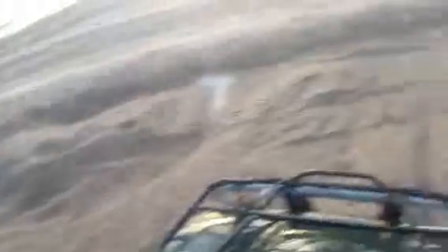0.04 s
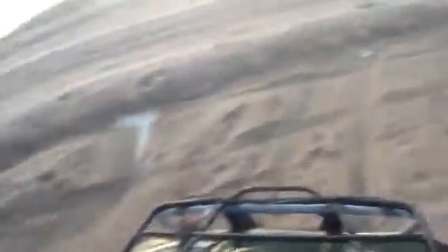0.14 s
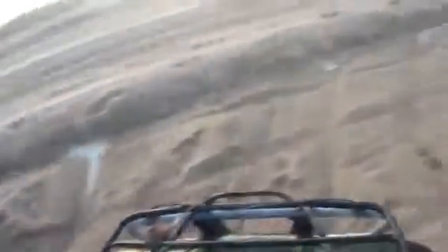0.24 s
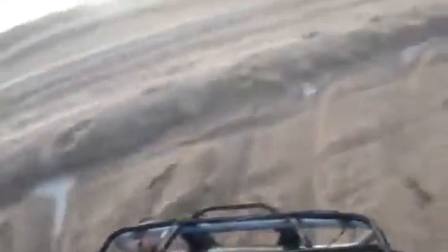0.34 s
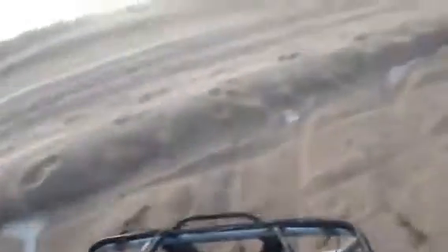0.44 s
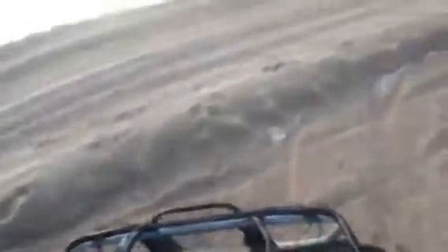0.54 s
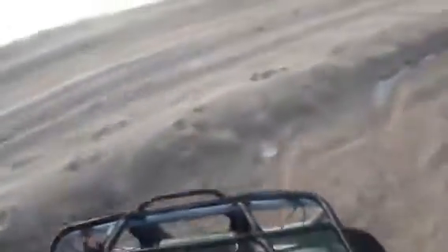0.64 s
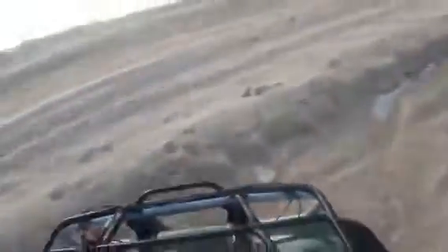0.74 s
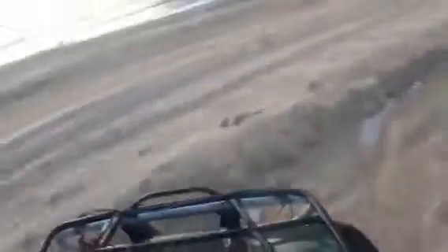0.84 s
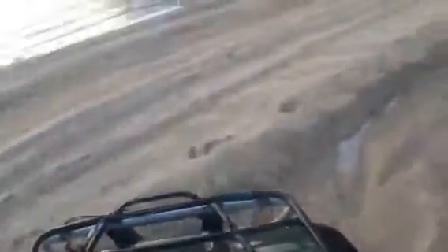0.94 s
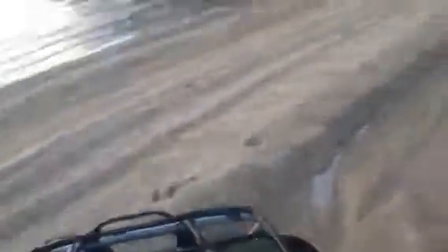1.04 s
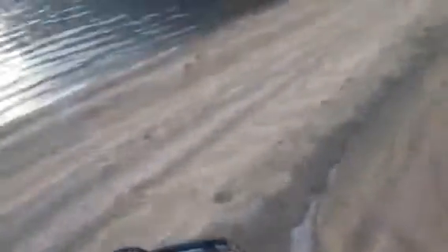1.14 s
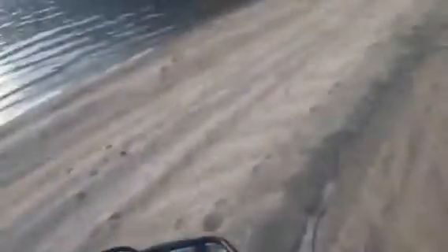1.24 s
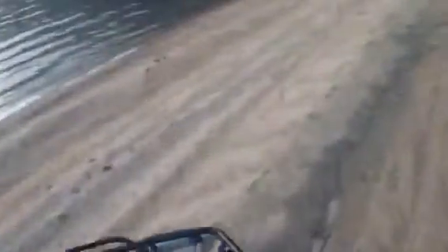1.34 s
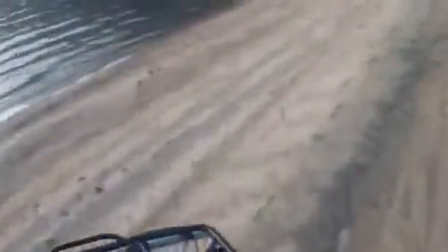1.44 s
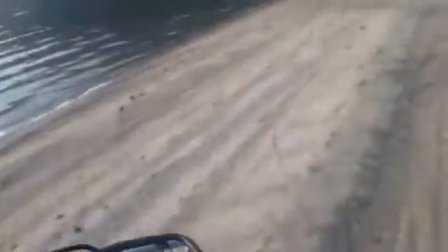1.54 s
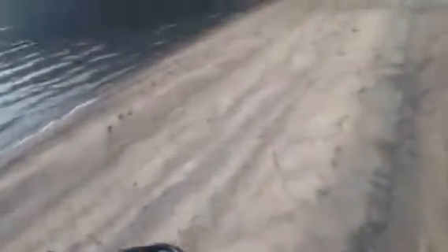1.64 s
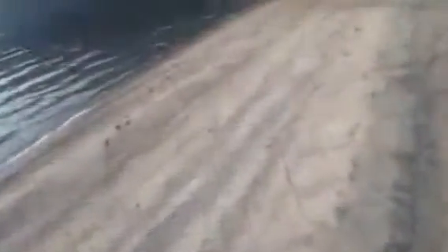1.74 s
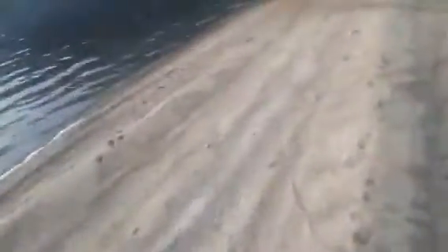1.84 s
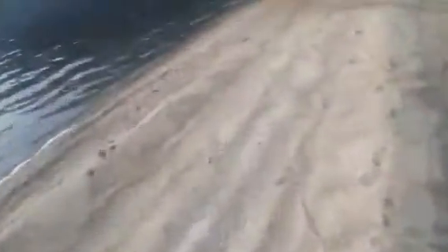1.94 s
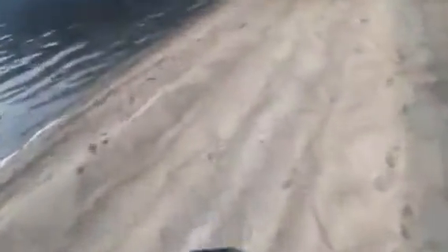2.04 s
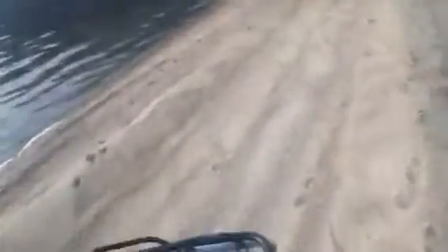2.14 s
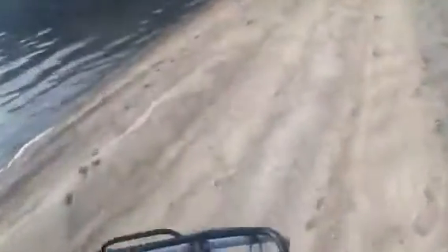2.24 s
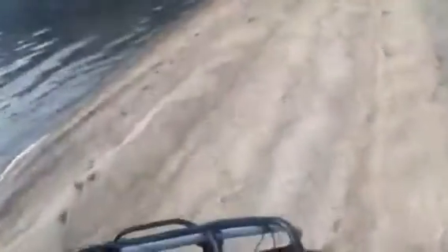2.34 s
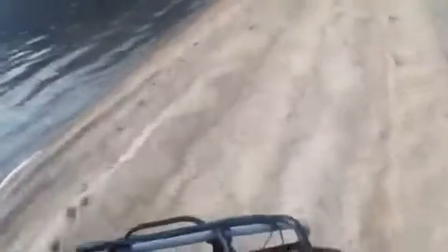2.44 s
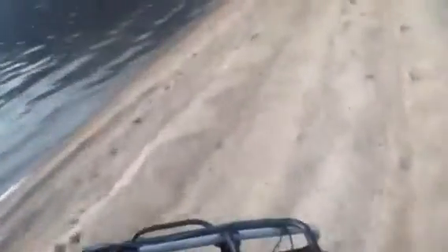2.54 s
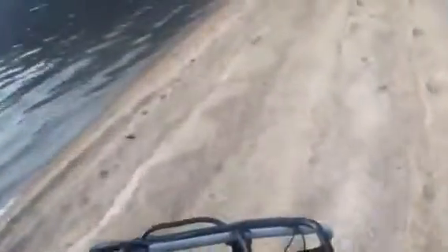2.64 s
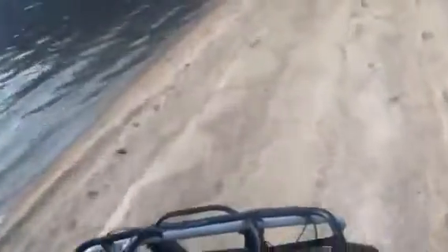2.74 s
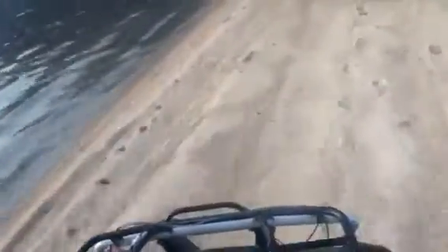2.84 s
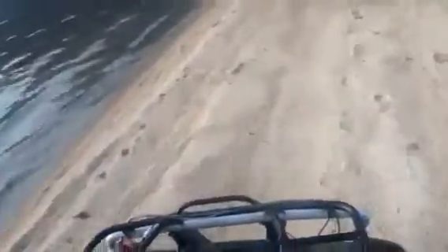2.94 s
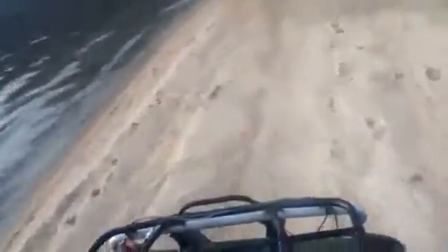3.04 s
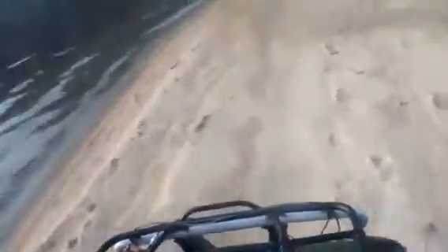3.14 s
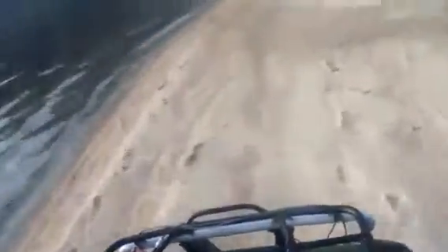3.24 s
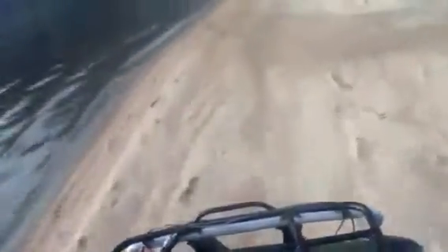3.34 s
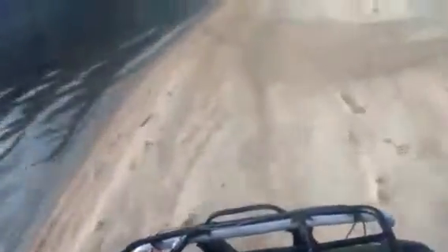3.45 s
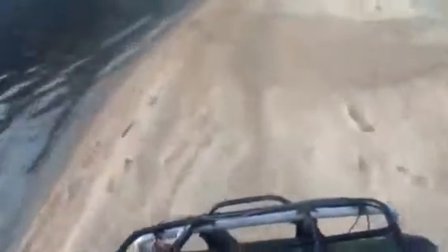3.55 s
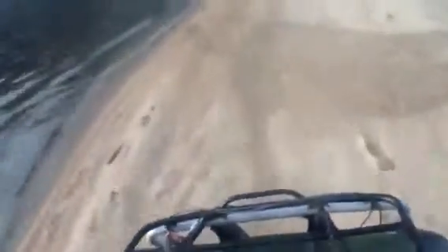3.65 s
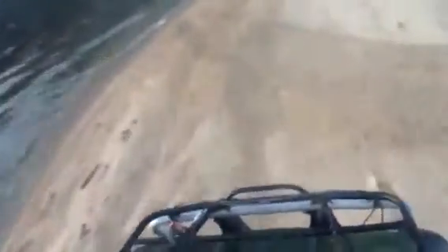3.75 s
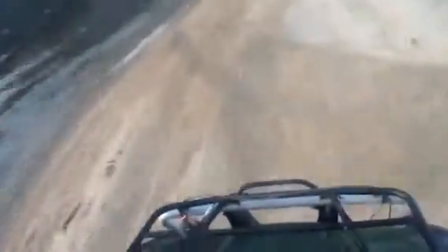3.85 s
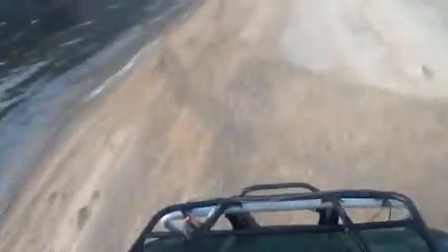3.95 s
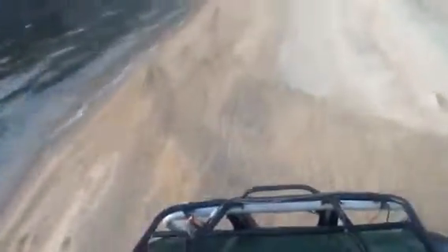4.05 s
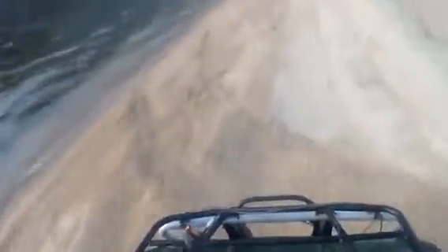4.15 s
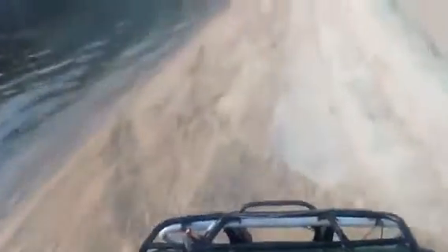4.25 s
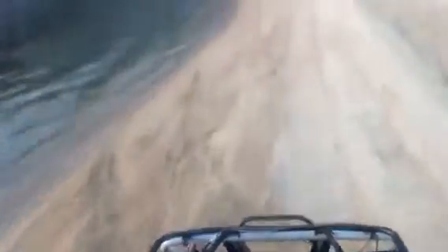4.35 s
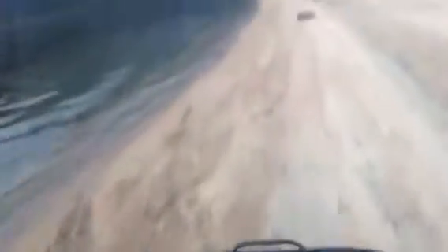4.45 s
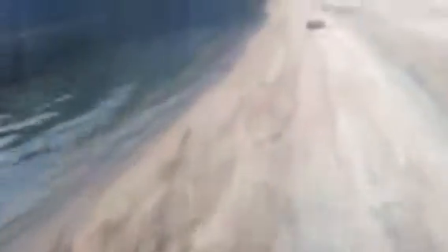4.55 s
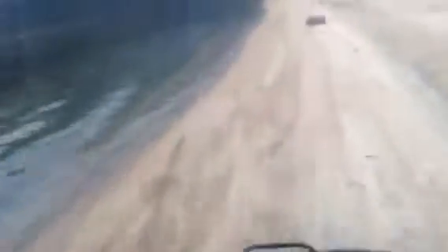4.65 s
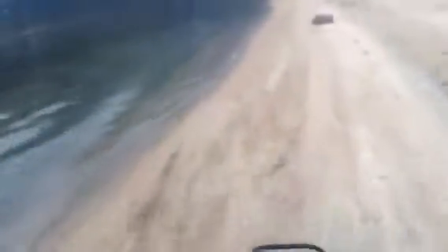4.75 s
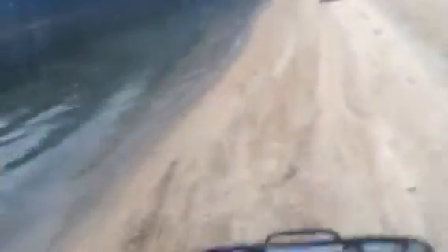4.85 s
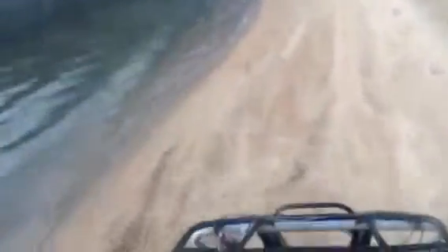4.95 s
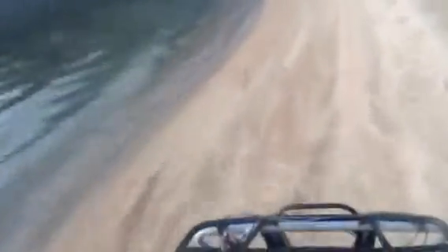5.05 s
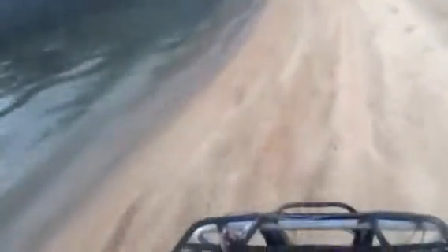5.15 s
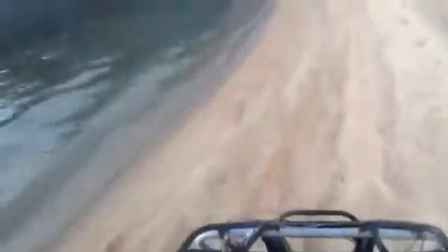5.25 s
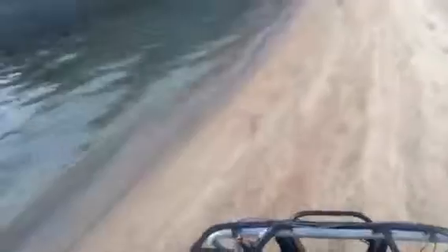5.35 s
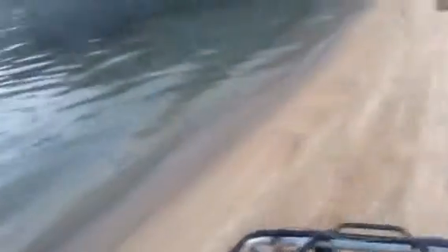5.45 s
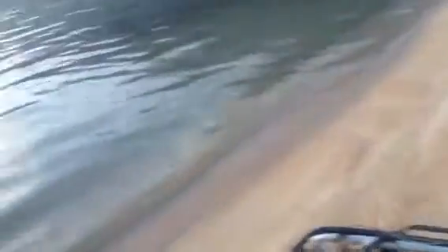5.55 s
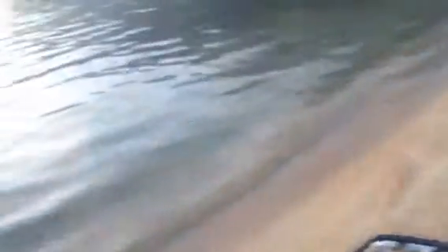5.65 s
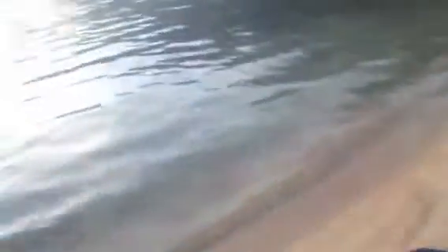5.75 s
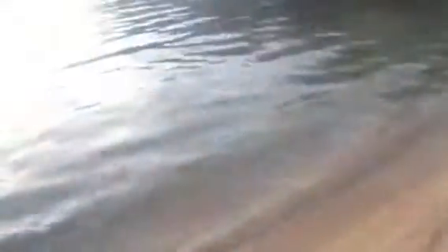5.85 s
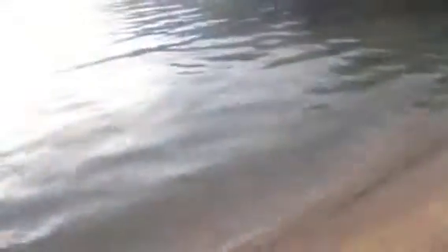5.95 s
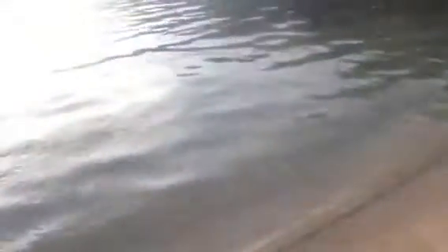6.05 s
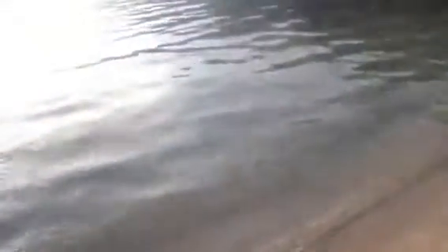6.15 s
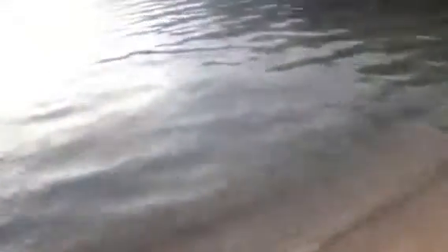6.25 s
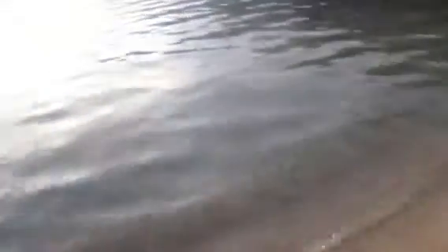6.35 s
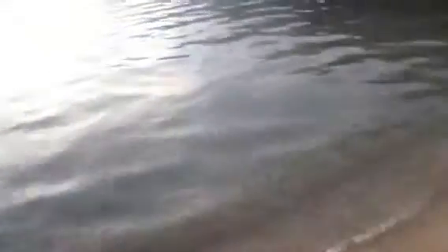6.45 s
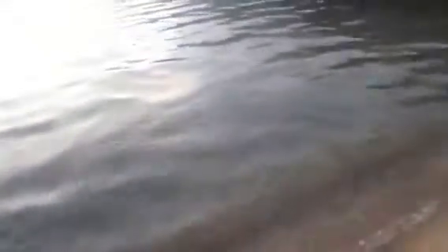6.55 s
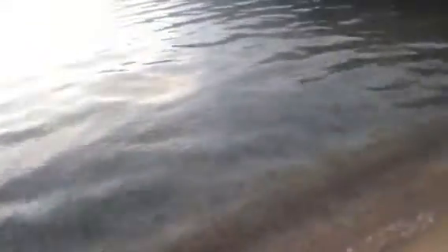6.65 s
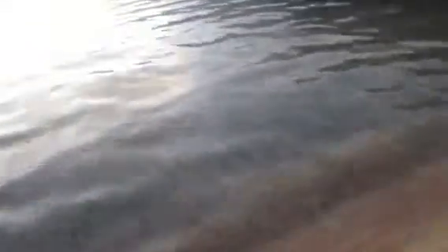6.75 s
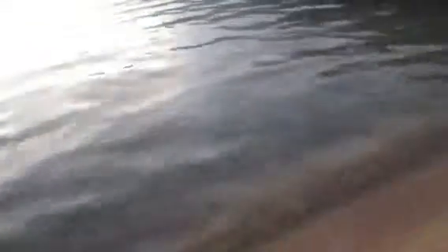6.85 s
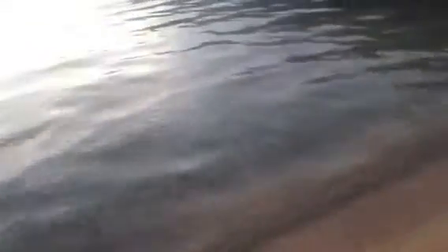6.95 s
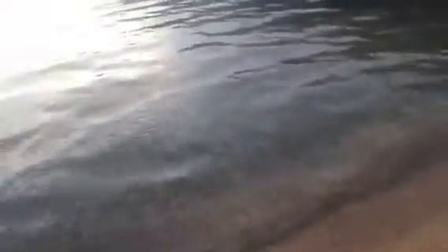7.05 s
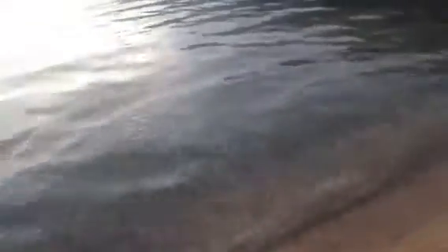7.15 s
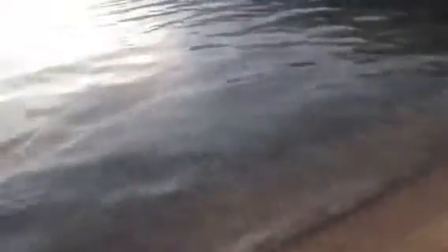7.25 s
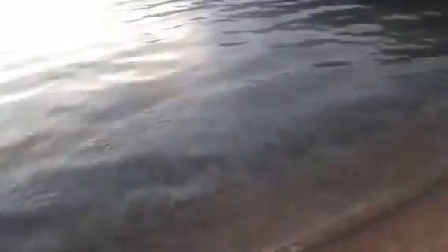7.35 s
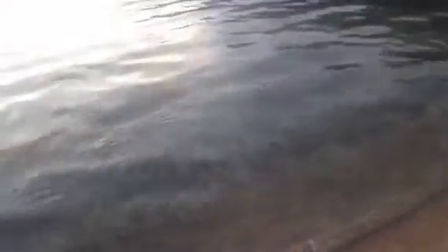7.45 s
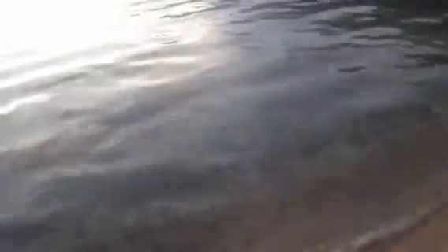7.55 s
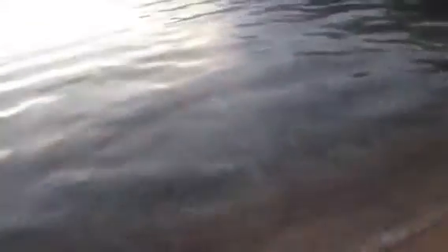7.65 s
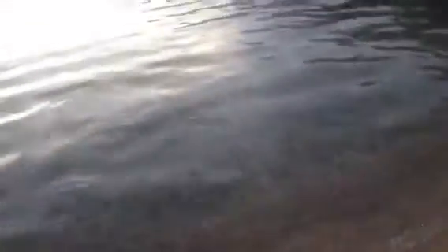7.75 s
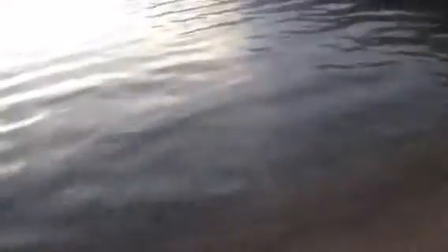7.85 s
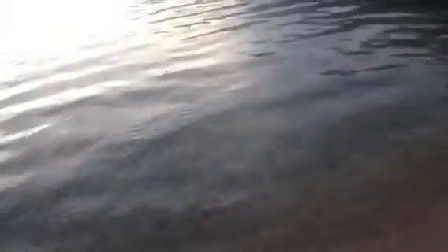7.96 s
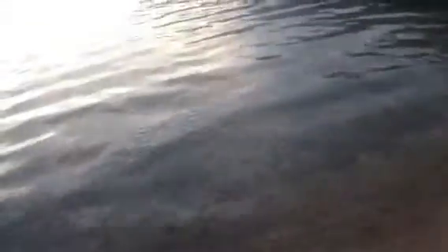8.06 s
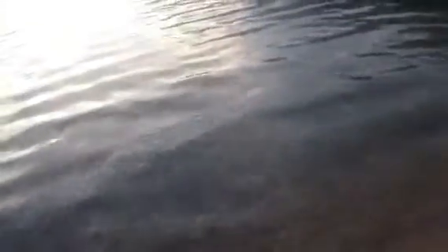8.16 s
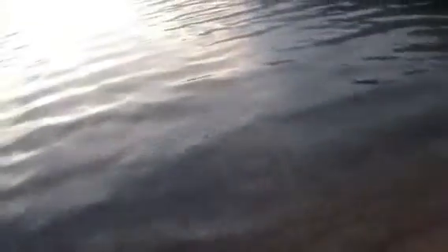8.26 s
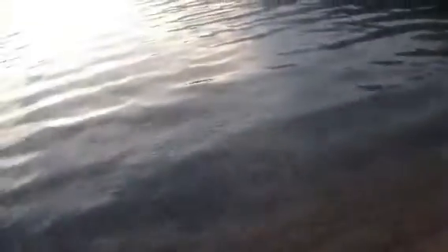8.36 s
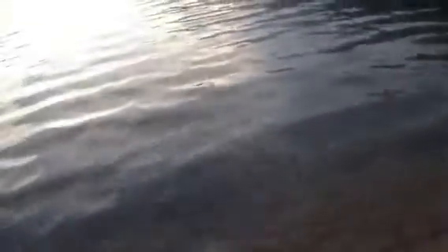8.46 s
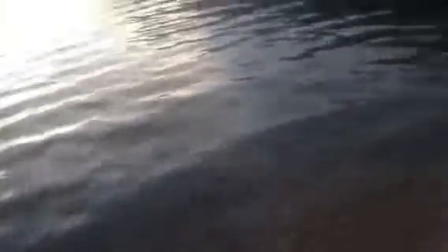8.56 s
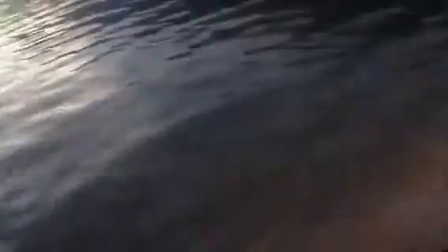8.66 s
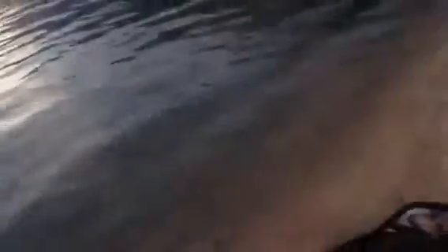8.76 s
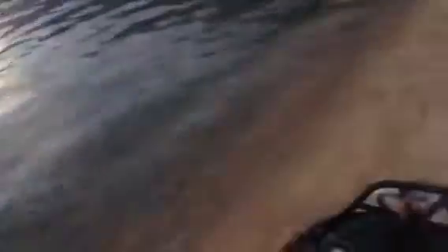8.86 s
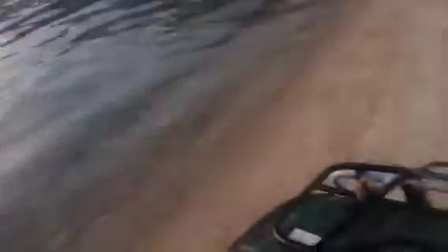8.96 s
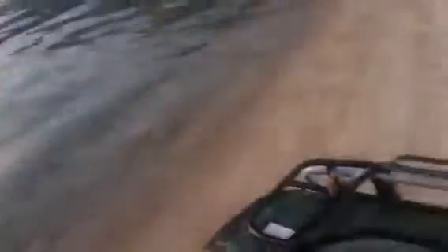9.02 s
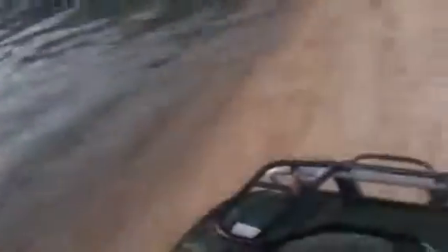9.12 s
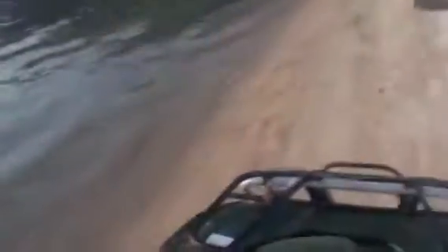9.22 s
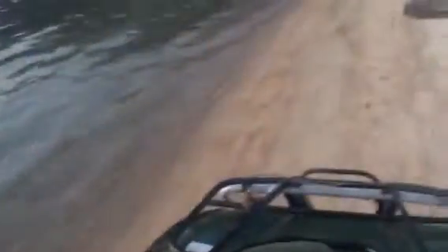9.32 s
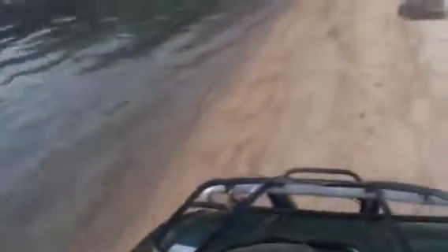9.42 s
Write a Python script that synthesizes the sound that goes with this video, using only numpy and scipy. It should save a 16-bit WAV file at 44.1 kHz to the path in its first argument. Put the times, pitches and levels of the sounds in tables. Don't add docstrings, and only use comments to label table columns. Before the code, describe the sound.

A single-cylinder quad bike pulls away, revs into a rattling drone, slows to a soft thumping idle, then snaps the throttle open and leaves again.

```python
import sys
import numpy as np
from scipy import signal
from scipy.fft import rfft, irfft, next_fast_len
from scipy.io import wavfile

SR = 44100
rng = np.random.default_rng(int(sys.argv[2]) if len(sys.argv) > 2 else 0)


def materialize(psi):
    bounded = np.clip(np.atleast_2d(psi).T, -1, 1)
    quanta = np.round(bounded * 32767).astype(np.int16)
    wavfile.write(sys.argv[1], SR, quanta)


def invert_db(x):
    u = np.asarray(x, float) / 20
    return 10 ** u


N = 418502

# (time [s], firing rate [1/s])
ENGINE_SPEED = [(0.0, 16.61), (0.3294, 17.805), (0.5075, 23.49), (0.7874, 25.268), (1.7828, 23.631),
                (1.9141, 26.794), (2.6288, 36.801), (3.9434, 34.275), (4.059, 30.63), (4.3617, 29.727),
                (4.4417, 24.895), (4.6959, 20.928), (5.6172, 15.508), (6.4858, 13.708), (8.02, 13.172),
                (8.7004, 13.42), (8.9442, 23.712), (9.5, 23.936)]
CRANK_AT_START = 0.915
# (time [s], exhaust pressure [dB], casing shake [dB])
ENGINE_EFFORT = [(0, -37, -38.5), (.18, -39, -42), (.42, -24.5, -35.5), (.58, -25, -32), (1.32, -30, -33.5),
                 (1.95, -25.5, -31), (2.48, -22.5, -24), (3.57, -23.5, -24), (3.94, -23, -26),
                 (4.44, -27, -33), (5.28, -35.5, -39.5), (5.6, -37, -41), (7.7, -38, -48.5),
                 (8.72, -37.5, -51), (8.76, -29, -38), (8.85, -24.5, -33.5), (9.17, -23.5, -30),
                 (9.49, -24, -27)]
# (time [s], strength [0-1], fade [s])
THROTTLE_PULLS = [
    (.36, 0.3, 0.44),
    (2.3, 0.3, 1.2),
    (8.74, .9, 1.2),
]
PULL_RISE_S = 0.013

# (time [s], level against the neighbours [dB])
UNEVEN_FIRINGS = [(.065, -3), (.181, -2.5), (.24, -3.5), (.297, -4.5), (.352, 1), (4.789, -4.5),
                  (4.942, -8.5), (4.994, 0.5), (5.045, -6.5), (5.097, -1.5), (5.151, -2.5), (5.205, -6),
                  (5.261, -5.5), (5.321, -11), (5.38, -10), (8.864, 2.5)]
# (firing rate [1/s], pipe-end echo [0-1], answer [-1 suction to 1 pressure])
VALVE_TIMING = [(13, 1, 0.15), (15.3, 0.3, 0.099), (15.5, 0.7, .45), (18.7, .4, -.05), (21.6, 0.6, -0.015),
                (24.3, 0.4, -0.052), (27.7, 0.2, 0.66), (31.1, 0.54, 0.71), (33.4, 0.5, -.1),
                (35.7, .3, 0.36)]
PIPE_ECHO_S, ANSWER_AT_CYCLE = 0.010573, 0.5
PULL_ECHO, PULL_ANSWER = 0.28, -0.25
# (frequency [Hz], level [dB])
PIPE_COLOUR = [(40, -130), (105, -65), (135, 1.5), (160, -2), (200, 2.5), (255, 3.5), (295, -6), (335, -8),
               (390, -61.5), (900, -130)]
# (frequency [Hz], width [Hz], level [dB])
PIPE_RING = [(283.6, 140, -1)]
# (frequency [Hz], width [Hz], level [dB])
SILENCER_RING = [(237.7, 26, -7.5), (188, 30, 0.5)]
LOAD_RING_DB, LOAD_RING_PER_DB = -22.5, 0.93
# (frequency [Hz], level [dB])
SILENCER_BOOM = [(25, -120), (55, -54.5), (80, 1.5), (100, 6.5), (125, 15.5), (150, 1), (190, -61.5),
                 (500, -130)]
IDLE_DB, BOOM_IDLE_DB, BOOM_LOSS_PER_DB = -38, -5.5, 0.96
MERGE_PER_S, MERGE_DB_PER_HZ, BOOM_DB_PER_HZ = 30.5, 0.23, 1
SHUDDER_DB, SHUDDER_DB_PER_HZ = -34, 1.9

# (frequency [Hz], width [Hz], level against exhaust pressure [dB])
STANDING_WAVES = [(110.5, 19, -13.5), (147.6, 7.8, -10), (182, 29, -9.5), (229, 26, -10), (245.2, 26, -10),
                  (323, 54, -12.5)]
DRONE_TONES = [(3, 0.15), (4, 0.37), (5, 1.4), (6, -1.67), (7, 1.17), (8, 0.11), (9, 0.33), (10, -0.21),
               (11, 0.86)]
DRONE_FROM_PER_S, DRONE_DB_PER_HZ = 29.2, 1.5
# (multiple of the firing rate, frequency [Hz], width [Hz], level against exhaust [dB])
AIRBOX_TONES = [(4, 97, 26, -13.5), (6, 146, 19, -7.5)]
PULL_HUM_DB = -8.5

# (frequency [Hz], level per Hz [dB])
CASING_COLOUR = [(190, -18), (330, 5), (392, -3), (458, 3), (610, 0.5), (683, -0.5), (734, -5.5), (859, 0),
                 (949, -10.5), (1090, -13.5), (1800, -19.5), (2690, -27.5), (3280, -31), (5730, -35.5),
                 (10000, -65.5), (13000, -91.5), (22000, -120)]
# (frequency [Hz], width [Hz], level above the colour [dB])
CASING_PANELS = [(466, 19, 3.5), (700, 31, 4.5), (780.5, 34, 6.5), (1348, 66, 3.5), (1778, 850, 10.5),
                 (3350, 180, 2.5), (4970, 54, 4.5), (5600, 40, 6)]
MID_SHAKE_DB = -35.5
GROWL_DB, GROWL_PER_DB = -36.5, 0.85
RATTLE_DB, RATTLE_PER_DB = -44, 1
SIZZLE_DB, SIZZLE_PER_DB = -58, 0.65
PULL_SIZZLE_DB, SIZZLE_DB_PER_HZ = 7, 0.4074
CHAIN_DB, TAPPETS_DB = -57.5, -66
THROB, PULL_THROB, SWAY, SWAY_AT_CYCLE = 0.051, 0.84, 0.081, 0.03
IDLE_THROB_PER_HZ, IDLE_BELOW_PER_S = 0.15, 14
HABIT, HABIT_PER_HZ = 0.62, 0.012

# (frequency [Hz], level per Hz [dB])
HISS_COLOUR = [(4100, -30), (7000, -1), (8070, -2), (9020, -7), (10100, -8), (11800, -7), (14500, 0),
               (15200, -2)]
HISS_DB, RUMBLE_DB = -76, -63.5
# (start [s], end [s], frequency [Hz], level [dB])
RUBBING_SQUEAKS = [(0.627, 0.804, 3230, -62), (0.8, 1.0, 3500, -63), (.8, 1.75, 3350, -65),
                   (3.034, 3.233, 772, -29), (3.8, 4.05, 3280, -57), (3.983, 4.188, 4100, -54.5),
                   (4.25, 4.336, 5600, -58), (7.134, 7.218, 1580, -49)]
# (start [s], end [s], first multiple of firing rate, last multiple, level [dB])
GEAR_TONES = [(0.873, 1.76, 23, 23.5, -43.5), (2.325, 2.72, 16.7, 19, -32), (2.714, 3.306, 19, 19, -35.5)]
# (time [s], peak [dB], frequency [Hz], 60 dB decay [s])
RACK_TICKS = [(1.469, -47, 3920, 0.021), (4.349, -40, 3180, 0.059), (4.382, -37, 3350, .04),
              (4.47, -60, 3700, 0.036), (4.555, -40, 2900, 0.034), (4.634, -38.5, 3500, 0.054),
              (4.888, -46, 2920, 0.088), (5.339, -40.5, 3450, 0.042), (5.339, -48, 8400, 0.024),
              (6.556, -49, 5900, 0.022), (7.504, -46, 5500, 0.059), (5.341, -32, 1600, .04),
              (6.32, -51, 4000, .03), (8.735, -31.5, 890, 0.082), (8.74, -44, 4800, .06),
              (8.8, -31, 1330, .06), (8.802, -52, 4480, .05)]
# (time [s], frequency [Hz])
BELT_PITCH = [(2.0, 452), (2.25, 468), (2.55, 520), (2.68, 512), (2.9, 452), (3.1, 427)]
BELT_DB, WHINE_FADE_S = -36, 0.12


def rms_one(x):
    return x / np.sqrt(np.mean(x ** 2) + 1e-20)


def in_time(rows):
    s, *columns = np.transpose(rows)
    return [np.interp(np.arange(N) / SR, s, column) for column in columns]


def drift(rate):
    r = np.exp(-32 * np.pi * rate / SR)
    noise = rng.standard_normal(N // 16 + 3002)
    slow = signal.lfilter([1], [1, -2 * r, r * r], noise)[3000:]
    return np.interp(np.arange(N) / 16, np.arange(len(slow)), rms_one(slow))


def cut(x, hz, kind, order=4):
    return signal.sosfilt(signal.butter(order, hz, kind, fs=SR, output="sos"), x)


def modes(x, table):
    out = 0
    for k, (hz, width_hz, db) in enumerate(table):
        r = np.exp(-np.pi * width_hz / SR)
        feedback = [1, -2 * r * np.cos(2 * np.pi * hz / SR), r * r]
        out = out + (-1) ** k * invert_db(db) * signal.lfilter([1 - r * r, 0, r * r - 1], feedback, x)
    return out


def coloured(x, spectrum, peaks=()):
    size = next_fast_len(N, True)
    hz = np.maximum(np.fft.rfftfreq(size, 1 / SR), 1)
    colour_hz, colour_db = np.transpose(spectrum)
    db = np.interp(np.log(hz), np.log(colour_hz), colour_db)
    for peak_hz, width_hz, peak_db in peaks:
        db = db + peak_db / (1 + (2 * (hz - peak_hz) / width_hz) ** 2)
    return irfft(rfft(x, size) * invert_db(db), size)[:N]


def clicks(times, sizes):
    at = np.round(times * SR).astype(int)
    inside = (at >= 0) & (at < N)
    return np.bincount(at[inside], sizes[inside], N) + 1e-18


def fade(start, end, fade_s):
    t = np.arange(N) / SR
    return np.clip(np.minimum(t - start, end - t) / fade_s, 0, 1)


def whine(hz, level_db):
    turns = np.cumsum(hz * (1 + 0.002 * drift(10))) / SR
    return invert_db(level_db + 4.5 + 0.5 * drift(19)) * np.sin(2 * np.pi * turns)


def crank():
    rate, = in_time(ENGINE_SPEED)
    cycle = CRANK_AT_START + np.cumsum(rate) / SR
    times = np.interp(np.arange(1, cycle[-1]), cycle, np.arange(N) / SR)
    return times, cycle, rate


def pull():
    t = np.arange(N) / SR
    out = 0
    for s, size, fade_s in THROTTLE_PULLS:
        rise = np.clip((t - s) / PULL_RISE_S, 0, 1)
        out = out + size * rise * np.exp(-np.maximum(t - s, 0) / fade_s)
    return out


def gas_pulses(times, rate):
    speed, echo, answer = np.transpose(VALVE_TIMING)
    echo = np.clip(np.interp(rate, speed, echo) + PULL_ECHO * pull(), 0, 1.5)
    answer = np.interp(rate, speed, answer) + PULL_ANSWER * pull()
    chance = rng.standard_normal((len(times), 5))
    period = np.gradient(times)
    unsteady = period / 0.26
    strength_db = unsteady * chance[:, 0]
    for s, db in UNEVEN_FIRINGS:
        strength_db[np.argmin(abs(times - s))] = db
    blow = times + 0.00015 * unsteady * chance[:, 1]
    gas = clicks(blow, invert_db(strength_db))
    gas = gas + echo * clicks(blow + PIPE_ECHO_S, invert_db(strength_db + 0.99 * chance[:, 3]))
    second_echo = clicks(blow + 2 * PIPE_ECHO_S, invert_db(strength_db + 2.5 * chance[:, 4]))
    gas = gas + 0.3 * echo ** 2 * second_echo
    answer_at = blow + ANSWER_AT_CYCLE * period + 0.0002 * chance[:, 2]
    gas = gas + answer * clicks(answer_at, invert_db(1.5 * unsteady * chance[:, 3]))
    return gas / np.sqrt(rate * (1 + echo ** 2 + answer ** 2))


def thumps(times, rate, exhaust_db):
    gas = gas_pulses(times, rate)
    fast = np.maximum(rate - MERGE_PER_S, 0)
    load_db = exhaust_db - IDLE_DB
    pipe = coloured(gas, PIPE_COLOUR)
    pipe = rms_one(pipe + modes(pipe, PIPE_RING))
    ring_gain = invert_db(LOAD_RING_DB + LOAD_RING_PER_DB * load_db)
    pipe = pipe + ring_gain * rms_one(modes(pipe, SILENCER_RING))
    pipe = pipe + 0.36 * rms_one(coloured(rng.standard_normal(N), PIPE_COLOUR))
    boom_db = BOOM_IDLE_DB - BOOM_LOSS_PER_DB * load_db - BOOM_DB_PER_HZ * fast
    boom = invert_db(boom_db) * rms_one(coloured(gas, SILENCER_BOOM))
    level_db = exhaust_db - MERGE_DB_PER_HZ * fast
    return invert_db(level_db - 1.5) * (pipe + boom) * (1 + 0.045 * drift(49))


def shudder(cycle, rate, exhaust_db):
    level_db = exhaust_db + SHUDDER_DB + SHUDDER_DB_PER_HZ * (rate - 32) + 2.0 * drift(3)
    return invert_db(level_db) * np.cos(4 * np.pi * cycle)


def drone(cycle, rate, exhaust_db):
    out = 0
    for multiple, share in DRONE_TONES:
        gain = 0
        for hz, width_hz, db in STANDING_WAVES:
            gain = gain + invert_db(db) / (1 + (2 * (multiple * rate - hz) / width_hz) ** 2)
        waver = invert_db(1.9 * drift(33) + 1.5 * drift(1.1))
        out = out + share * gain * waver * np.cos(2 * np.pi * multiple * cycle)
    slow = np.maximum(DRONE_FROM_PER_S - rate, 0)
    return invert_db(exhaust_db + 3 - DRONE_DB_PER_HZ * slow) * out


def airbox_hum(cycle, rate, exhaust_db):
    hum = 0
    for multiple, hz, width_hz, db in AIRBOX_TONES:
        gain = invert_db(exhaust_db + db) / (1 + (2 * (multiple * rate - hz) / width_hz) ** 2)
        hum = hum + gain * np.sin(2 * np.pi * multiple * cycle)
    return invert_db(PULL_HUM_DB * pull()) * hum


def contact_throb(cycle, rate):
    depth = np.clip(THROB + PULL_THROB * pull(), 0, 1)
    sway = np.clip(SWAY + IDLE_THROB_PER_HZ * np.maximum(IDLE_BELOW_PER_S - rate, 0), 0, 0.8)
    firing = 1.7 * np.exp(9 * (np.cos(2 * np.pi * (cycle - 0.02)) - 1))
    intake = 0.6 * np.exp(3 * (np.cos(2 * np.pi * (cycle + 0.22)) - 1))
    swing = np.cos(2 * np.pi * (cycle - SWAY_AT_CYCLE))
    return 1 + depth * (firing + intake - 0.55) + sway * swing


def returning_contacts(cycle):
    habit = 0
    for teeth in rng.standard_normal((2, 96)):
        pattern = np.interp(cycle % 1, np.arange(96) / 96, teeth, period=1)
        habit = habit + pattern * (1 + 0.4 * drift(1.8))
    return rms_one(cut(coloured(habit, CASING_COLOUR, CASING_PANELS), 950, "low"))


def casing(cycle, rate, shake_db):
    shake = shake_db - MID_SHAKE_DB
    throb = contact_throb(cycle, rate)
    grains = rng.standard_normal((3, N)) * invert_db(2.0 * np.minimum(rng.exponential(1, (3, N)), 6))
    low, middle, high = [
        coloured(rms_one(row) * throb * invert_db(0.8 * drift(8.9)), CASING_COLOUR, CASING_PANELS)
        for row in grains]
    habit_share = HABIT + HABIT_PER_HZ * np.maximum(rate - 24, 0)
    growl = rms_one(cut(low, 913, "low")) + habit_share * returning_contacts(cycle)
    growl = rms_one(cut(growl, 376, "high", order=3))
    rattle = rms_one(cut(middle, [950, 2300], "band"))
    sizzle = rms_one(cut(high, 2995, "high"))
    sizzle_db = SIZZLE_DB + SIZZLE_PER_DB * shake
    sizzle_db = sizzle_db + PULL_SIZZLE_DB * pull() + SIZZLE_DB_PER_HZ * (rate - 24)
    growl_gain = invert_db(GROWL_DB + GROWL_PER_DB * shake)
    rattle_gain = np.hypot(invert_db(RATTLE_DB + RATTLE_PER_DB * shake), invert_db(CHAIN_DB))
    sizzle_gain = np.hypot(invert_db(sizzle_db), invert_db(TAPPETS_DB))
    return growl_gain * growl + rattle_gain * rattle + sizzle_gain * sizzle


def background():
    hiss = invert_db(HISS_DB) * rms_one(coloured(rng.standard_normal(N), HISS_COLOUR))
    rumble = cut(rng.standard_normal(N), [52, 85], "band", order=3)
    return hiss + invert_db(RUMBLE_DB) * rms_one(rumble)


def squeaks():
    out = 0
    rub = rng.standard_normal(N)
    for start, end, hz, db in RUBBING_SQUEAKS:
        line = [(hz, 0.067 * hz, 0)]
        out = out + invert_db(db) * fade(start, end, 0.044) * rms_one(modes(modes(rub, line), line))
    return out


def gear_whine(rate):
    out = 0
    for start, end, first, last, db in GEAR_TONES:
        multiple, = in_time([(start, first), (end, last)])
        out = out + fade(start - 0.05, end + 0.056, WHINE_FADE_S) * whine(multiple * rate, db)
    return out


def ticks():
    out = np.zeros(N)
    t = np.arange(4410) / SR
    for s, peak_db, hz, t60 in RACK_TICKS:
        burst = rng.standard_normal(len(t)) * invert_db(-60 * t / t60)
        crack = cut(cut(burst, 0.3 * hz, "high", order=1), 1.25 * hz, "low", order=6)
        knock = 0.5 * rms_one(modes(crack, [(hz, 0.053 * hz, 0)])) + rms_one(crack)
        out[round(s * SR):][:len(t)] += invert_db(peak_db) * knock / abs(knock).max()
    return out


def belt_whine():
    gain = fade(BELT_PITCH[0][0], BELT_PITCH[-1][0], WHINE_FADE_S)
    return gain * whine(*in_time(BELT_PITCH), BELT_DB)


def scene():
    times, cycle, rate = crank()
    exhaust_db, shake_db = in_time(ENGINE_EFFORT)
    engine = thumps(times, rate, exhaust_db) + shudder(cycle, rate, exhaust_db)
    engine = engine + drone(cycle, rate, exhaust_db) + airbox_hum(cycle, rate, exhaust_db)
    engine = engine + casing(cycle, rate, shake_db)
    drive = gear_whine(rate) + belt_whine()
    return (engine + background() + squeaks() + drive + ticks())[None]


def roll_off(x):
    return signal.sosfilt(signal.butter(12, 16380, fs=SR, output="sos"), x)


def record(dry):
    dry = signal.sosfilt(signal.cheby2(20, 60, 15600, fs=SR, output="sos"), dry)
    mix = dry * np.minimum((N - np.arange(N)) / 300, 1)
    return roll_off(mix)


dry = scene()
out = record(dry)
materialize(out)
```